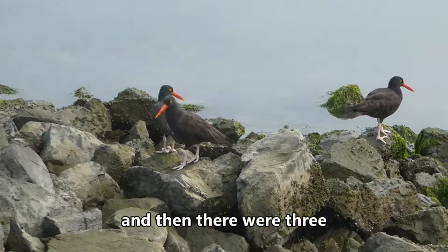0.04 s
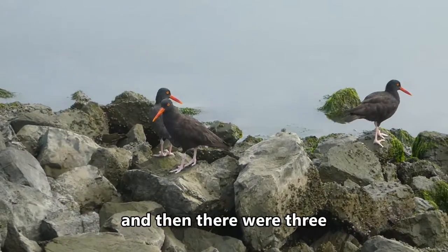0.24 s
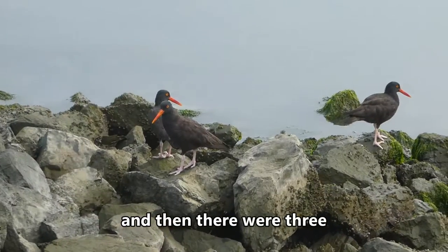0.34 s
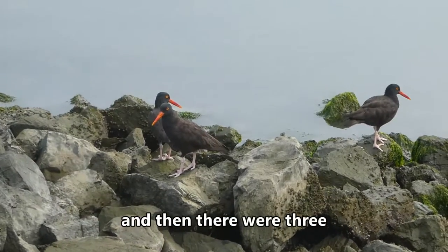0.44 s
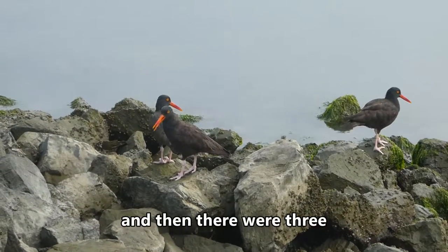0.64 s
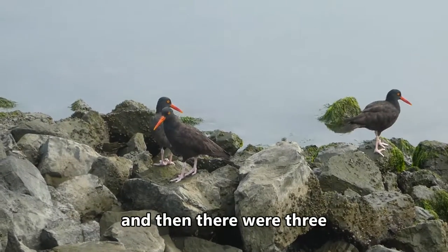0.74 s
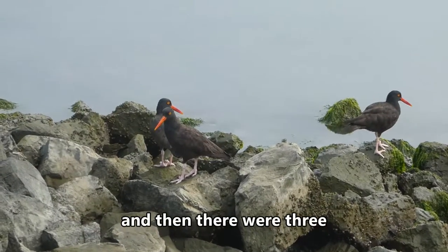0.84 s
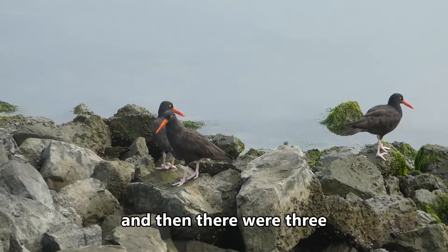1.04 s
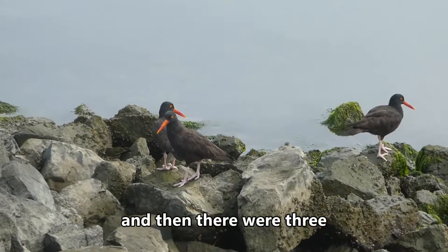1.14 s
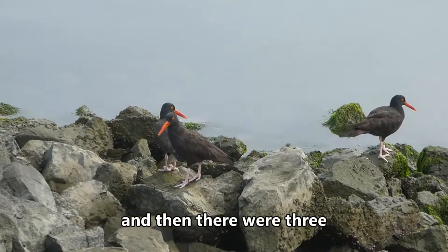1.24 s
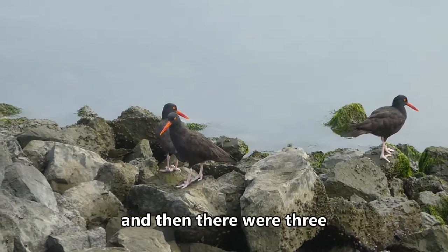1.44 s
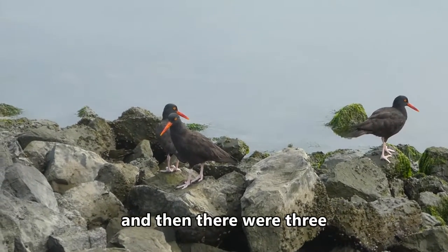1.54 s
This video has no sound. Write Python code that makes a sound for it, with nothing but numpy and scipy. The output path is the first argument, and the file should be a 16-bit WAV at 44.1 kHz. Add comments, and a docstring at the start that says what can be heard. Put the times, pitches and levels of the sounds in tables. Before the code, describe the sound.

An oystercatcher gives three short, sharp whistling calls over faint calm water.

```python
"""After a moment of silence, a faint, even wash of calm water and distant air, and at once an
oystercatcher: three sharp "kip" calls, about half a second apart, heard in stereo on a rocky shore.
Each starts with a low, raspy upward scrape, then the voice breaks into a loud arched whistle.
Boulders near the microphones answer briefly. One tiny dry tick follows the last call."""
import sys
import numpy as np
from scipy import signal
from scipy.fft import rfft, irfft, next_fast_len
from scipy.io import wavfile
from scipy.ndimage import uniform_filter1d, map_coordinates

SR = 44100
rng = np.random.default_rng(int(sys.argv[2]) if len(sys.argv) > 2 else 0)


def waveform_to_disk(signal):
    """Save audio, clipped to [-1, 1], as 16-bit WAV at the path in sys.argv[1]."""
    frames = np.transpose(np.atleast_2d(signal))
    scaled = np.clip(frames, -1, 1) * 32767
    samples = np.round(scaled).astype(np.int16)
    wavfile.write(sys.argv[1], SR, samples)


N = 70560
TIME = np.arange(N) / SR

# The water and distant air. Each row: frequency in Hz, relative spectral density in dB.
WASH_SPECTRUM = [(25, -42), (70, -29), (130, -23.5), (200, -17), (320, -17.5), (470, -11.5), (700, -7),
                 (1100, -5), (1400, 0.5), (1700, -4.5), (2000, -10.5), (2500, -6), (3500, -10), (5500, -18),
                 (8200, -24.5), (9600, -23.5), (13000, -33.5), (15500, -38)]
# How alike the two microphones hear the wash. Each row: frequency in Hz, correlation.
WASH_LIKENESS = [(60, .3), (130, 1), (300, 0.59), (1400, 0.48), (3100, 0.65), (7000, 0.59), (15000, .3)]
# The wash sits a little to the right. Each row: frequency in Hz, left minus right in dB.
WASH_BALANCE = [(100, -1), (700, -1), (1300, -3.5), (2400, -2), (4400, -1.5), (8000, 0.5)]
# Its slow rise and fall. Each row: time in seconds, gain in dB.
WASH_DRIFT = [(.2, -0.3), (.65, -0.1), (.9, 0.24), (1.15, -1.46), (1.4, 1), (1.6, .2)]
# The calls. Each row: voice break in seconds, whistle length in seconds, top pitch in Hz, whistle gain
# in dB, overtone gain in dB, scrape gain in dB, fundamental's left minus right in dB, swell depth factor.
CALLS = [(0.2191, 0.048, 2350, -19, 0.5, -26.5, -3.5, 1.14),
         (0.7339, 0.049, 2348, -18.5, -1, -26.5, -3.5, 1.13),
         (1.2988, 0.049, 2255, -24.5, 0.5, -28.5, -4.5, 0.49)]
# The effort behind the scrape. Each row: share of its length, gain in dB.
SCRAPE_ENVELOPE = [(0, -14), (.15, -1), (.45, -2), (.67, -1), (.8, -3.5), (1, -1)]
# The throat resonances the scrape sweeps through. Each row: frequency in Hz, gain in dB.
THROAT_RESPONSE = [(950, -26.5), (1500, -20), (1950, -2), (2400, -2.5), (2620, -11.5), (2900, 0),
                   (3200, -10), (3500, -3), (4000, -18.5), (4700, -6), (5600, -23), (7800, -20.5),
                   (12000, -37)]
# The hoarse edge of the voice. Each row: frequency in Hz, relative spectral density in dB.
RASP_SPECTRUM = [(100, -49), (1000, -15.5), (2300, 10.5), (3300, -3.5), (4700, -6), (5800, -28),
                 (7000, -11), (8000, -15.5), (9200, -27), (10100, -18), (11300, -25), (12500, -32),
                 (13600, -32), (15000, -45)]
# The whistle's arch. Each row: share of its length, pitch as a ratio of the top pitch.
WHISTLE_ARCH = [(0, .955), (.18, 0.98), (.42, 1), (.6, 0.99), (.75, 0.98), (.86, 0.901), (1, 0.865)]
# The effort behind the whistle. Each row: share of its length, gain in dB at swell depth 1,
# overtone gain in dB.
WHISTLE_EFFORT = [(0, -5.5, -1), (.12, -2.5, 1), (0.301, 0, 0.5), (.62, -1.5, 0.5), (.8, -7, 3.5),
                  (.9, -13.5, -11.5), (1, -10, -18)]
# The strength of the whistle's partials. Each row: frequency in Hz, gain in dB.
BILL_RESPONSE = [(1900, 0), (2350, -1), (4200, -5.5), (4700, -7), (6500, -23), (6750, -13.5), (7050, -19.5),
                 (8400, -18), (8950, -11), (9300, -23.5), (10100, -38), (10700, -17), (11200, -28),
                 (11700, -29.5), (12400, -43), (13000, -38), (13500, -41), (14100, -41), (14700, -57),
                 (15600, -43), (16100, -70)]
# Boulders close to the microphones. Each row: left delay in seconds, right delay in seconds, gain in dB.
BOULDER_ECHOES = [(.0031, 0.0021, -26), (.0068, 0.0079, -17.5), (0.013, .0131, -33), (0.0175, .0179, -41)]
# The colour of the boulder field's scatter. Each row: frequency in Hz, gain in dB.
SCATTER_COLOUR = [(1000, 8), (2300, 4), (4600, 2), (7000, 6.5), (10000, 4), (14000, 17.5)]
# The tick. Each row: frequency in Hz, relative spectral density in dB.
TICK_SPECTRUM = [(1000, -30), (4000, -12), (5500, 0), (7500, -3), (10000, -16), (15000, -30)]

ATTACK_S, RELEASE_S, FLUTTER_PER_S = 0.003, 0.004, 900  # the bird's voice


def amp(db):
    """Decibels to gain."""
    return 10 ** (np.asarray(db) / 20)


def unit(x):
    """x at rms 1."""
    return x / np.sqrt(np.mean(x ** 2) + 1e-20)


def along(points, hz):
    """(Hz, value) points read on a log axis."""
    f, v = np.transpose(points)
    return np.interp(np.log(hz + 1), np.log(f + 1), v)


def wobble(rate):
    """A smooth random curve, rate knots a second."""
    return map_coordinates(rng.standard_normal(int(N * rate / SR) + 4), [TIME * rate])


def ramp(u):
    """A smooth step from 0 to 1."""
    return np.sin(np.pi / 2 * np.clip(u, 0, 1)) ** 2


def filtered(x, response):
    """x through a frequency response."""
    size = next_fast_len(N + SR // 2)
    return irfft(rfft(x, size) * response(np.fft.rfftfreq(size, 1 / SR)), size)[..., :N]


def noise(spectrum):
    """Noise of the given spectral shape, at rms 1."""
    return unit(filtered(rng.standard_normal(N), lambda hz: amp(along(spectrum, hz))))


def pan(lean_db):
    """Gains at the two microphones, the left lean_db above the right."""
    return amp(lean_db * np.array([[.5], [-.5]]))


def partials(hz, colour, count, waver_step_db=0.57):
    """One row per harmonic of a moving pitch, weighted by a fixed colour; high ones waver most."""
    k = np.arange(1, count + 1)[:, None]
    waver_db = waver_step_db * (k - 1) * np.array([wobble(rate=180) for _ in k])
    strength = amp(along(colour, k * hz) + waver_db) * (k * hz < SR / 2)
    turns = k * np.cumsum(hz) / SR + rng.random((count, 1))
    return np.sqrt(2) * strength * np.cos(2 * np.pi * turns)


def shore_wash(level_db=-54, sway_db=0.24, patchy_db=1.76):
    """Calm water and distant air, faint and wide, in shifting patches."""
    bands = signal.stft(rng.standard_normal((2, N)), nperseg=512)[2]
    patches = uniform_filter1d(rng.standard_normal(bands.shape[1:]), size=5, axis=0)  # across frequency
    patches = uniform_filter1d(patches, size=10, axis=1)  # across time
    pair = signal.istft(bands * amp(patchy_db * unit(patches)), nperseg=512)[1][:, :N]
    pair = filtered(pair, lambda hz: amp(along(WASH_SPECTRUM, hz)))
    width = lambda hz: np.arccos(along(WASH_LIKENESS, hz)) / 2
    mid, side = filtered(pair, lambda hz: np.array([np.cos(width(hz)), np.sin(width(hz))]))
    wash = filtered(np.array([mid + side, mid - side]), lambda hz: pan(along(WASH_BALANCE, hz)))
    drift_db = np.interp(TIME, *np.transpose(WASH_DRIFT))
    return unit(wash) * amp(level_db + drift_db + sway_db * wobble(rate=5.8))


def scrape(end, gain_db, lean_db, length_s=0.0175, from_hz=900, to_hz=1775, jitter=0.0198, shimmer_db=1):
    """The bird's rough low register climbs through the throat's resonances."""
    progress = np.clip(1 + (TIME - end) / length_s, 0, 1)
    hz = (from_hz + (to_hz - from_hz) * progress) * (1 + jitter * wobble(FLUTTER_PER_S))
    gate = ramp(progress * length_s / ATTACK_S) * ramp((end - TIME) / ATTACK_S + .5)
    effort_db = np.interp(progress, *np.transpose(SCRAPE_ENVELOPE))
    loudness = gate * amp(gain_db + effort_db + shimmer_db * wobble(FLUTTER_PER_S))
    harmonics = partials(hz, THROAT_RESPONSE, count=6)
    # The series tilts down 4.5 dB a step, pivoting on the second harmonic.
    buzz = sum(amp(-4.5 * (k - 2)) * harmonic for k, harmonic in enumerate(harmonics, start=1))
    return loudness * (buzz + rasp(gain_db=-10)) * pan(lean_db)


def rasp(gain_db):
    """The hoarse noise in the bird's voice, strongest near 2.3 kHz."""
    return amp(gain_db) * noise(RASP_SPECTRUM)


def whistle(start, length, top_hz, gain_db, overtones_db, lean_db, swell, jitter=0.0027, shimmer_db=0.79):
    """The voice breaks into a clear arched note whose overtones drop away as the effort ends."""
    progress = (TIME - start) / length
    share, effort_db, bright_db = np.transpose(WHISTLE_EFFORT)
    arch = np.interp(progress, *np.transpose(WHISTLE_ARCH))
    hz = top_hz * arch * (1 + jitter * wobble(FLUTTER_PER_S))
    gate = ramp((TIME - start) / ATTACK_S + .5) * ramp((start + length - TIME) / RELEASE_S + .5)
    swell_db = swell * np.interp(progress, share, effort_db)
    loudness = gate * amp(gain_db + swell_db + shimmer_db * wobble(FLUTTER_PER_S))
    harmonics = partials(hz, BILL_RESPONSE, count=7)
    overtones = harmonics[1:].sum(0) * amp(overtones_db + np.interp(progress, share, bright_db))
    return loudness * (harmonics[0] * pan(lean_db) + overtones + rasp(gain_db=-25))


def oystercatcher():
    """The bird, a little to the right: every call is a scrape and then a whistle."""
    calls = np.zeros((2, N))
    for break_s, length, top_hz, whistle_db, overtones_db, scrape_db, lean_db, swell in CALLS:
        calls += scrape(break_s, scrape_db, lean_db / 2)
        calls += whistle(break_s, length, top_hz, whistle_db, overtones_db, lean_db, swell)
    return calls


def boulders(voice, scatter_db=-20.5, t60_s=0.084, rise_s=0.0063):
    """A few reflections from the nearest rocks and a short scatter from the boulder field."""
    close = filtered(voice, lambda hz: sum(amp(db) * np.exp(-2j * np.pi * hz * [[left], [right]])
                                           for left, right, db in BOULDER_ECHOES))
    tail = rng.standard_normal((2, N)) * amp(-60 * TIME / t60_s) * ramp(TIME / rise_s)
    scatter = signal.fftconvolve(voice[None], tail / np.linalg.norm(tail[0]), axes=1)[:, :N]
    return close + filtered(scatter, lambda hz: amp(scatter_db + along(SCATTER_COLOUR, hz)))


def tick(start_s=1.4, gain_db=-54, t60_s=0.013):
    """One tiny dry tick, dead centre, just after the last call."""
    age = TIME - start_s
    return noise(TICK_SPECTRUM) * ramp(age / .001) * amp(gain_db - 60 * np.maximum(age, 0) / t60_s)


def scene():
    """The shore from the microphones: the wash behind, the bird among the rocks in front."""
    wash = shore_wash()
    calls = oystercatcher()
    return wash + calls + boulders(calls.mean(0)) + tick()


def record(dry, open_s=0.197, fade_s=0.0033, top_hz=15850):
    """The microphones open after a moment of silence; nothing is kept above the band limit."""
    return filtered(dry * ramp((TIME - open_s) / fade_s), lambda hz: hz < top_hz)


dry = scene()
out = record(dry)
waveform_to_disk(out)
```